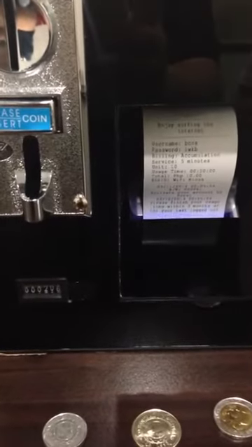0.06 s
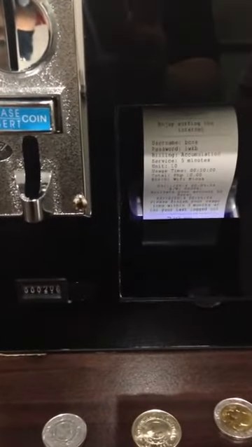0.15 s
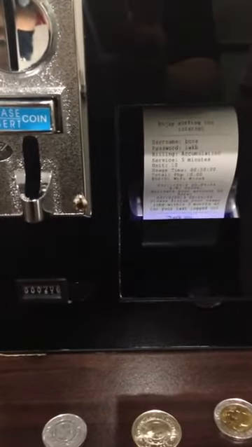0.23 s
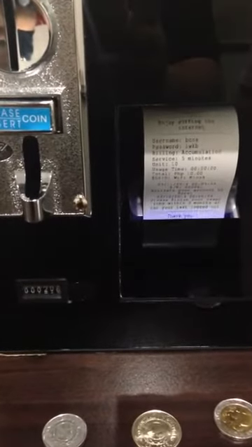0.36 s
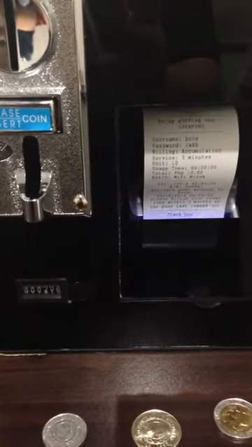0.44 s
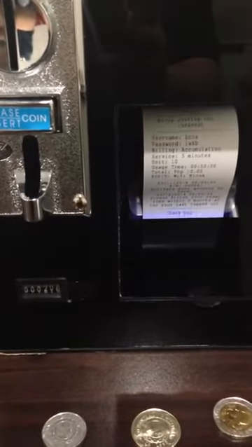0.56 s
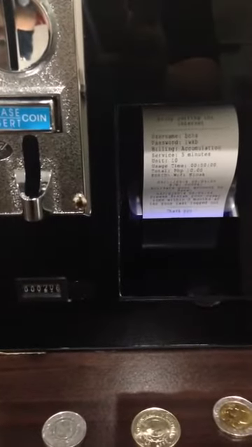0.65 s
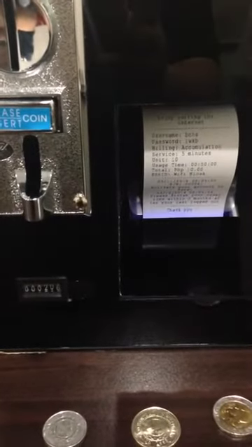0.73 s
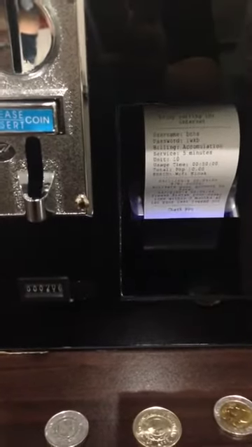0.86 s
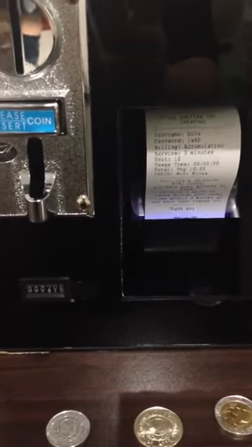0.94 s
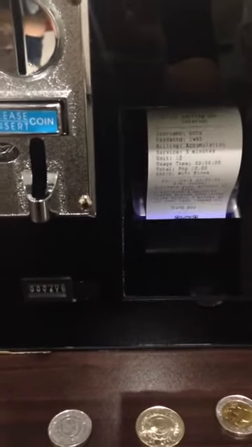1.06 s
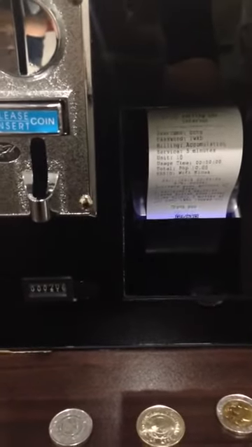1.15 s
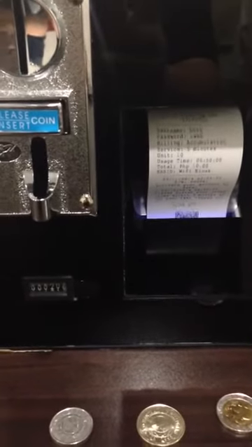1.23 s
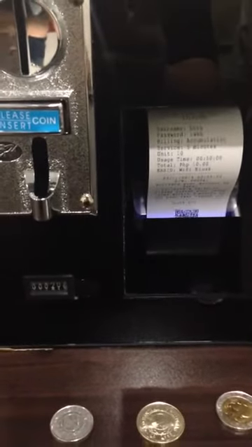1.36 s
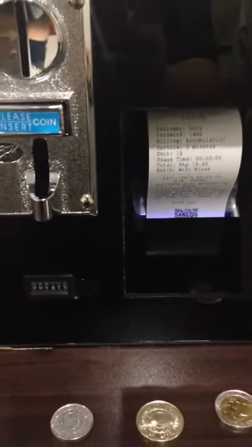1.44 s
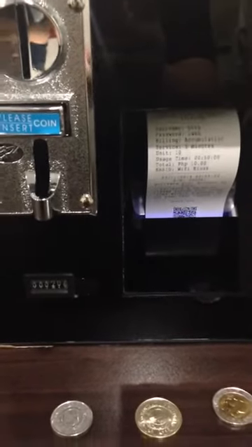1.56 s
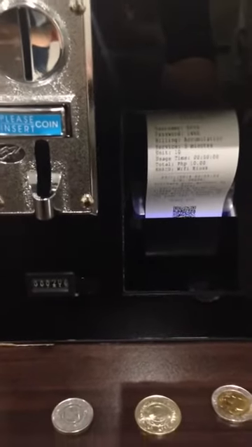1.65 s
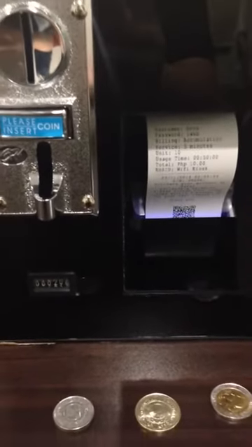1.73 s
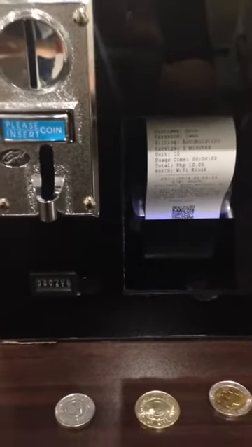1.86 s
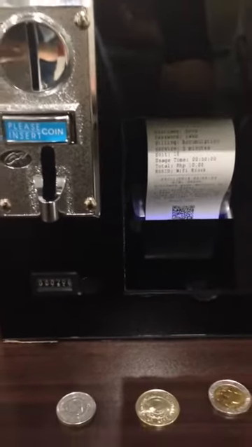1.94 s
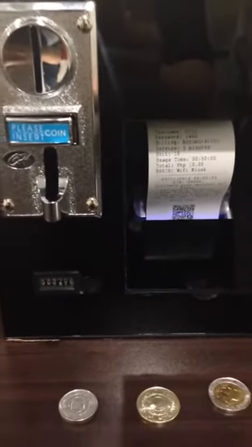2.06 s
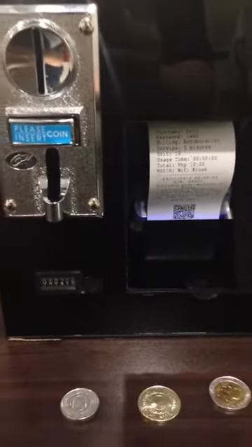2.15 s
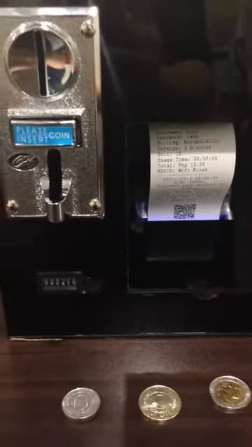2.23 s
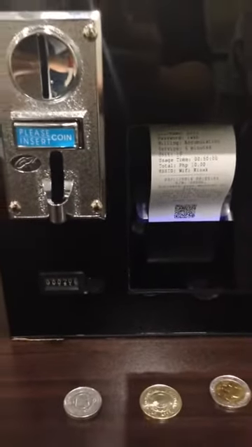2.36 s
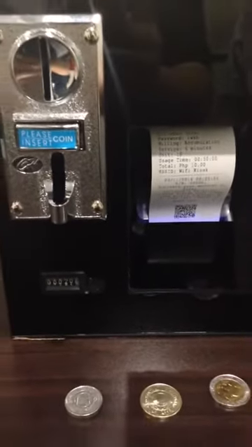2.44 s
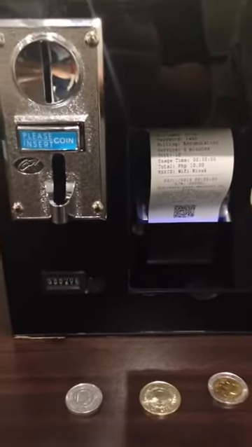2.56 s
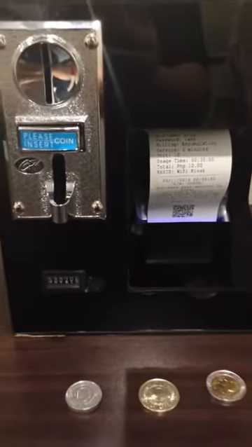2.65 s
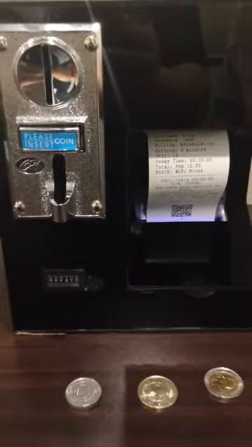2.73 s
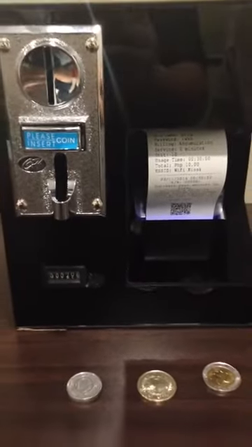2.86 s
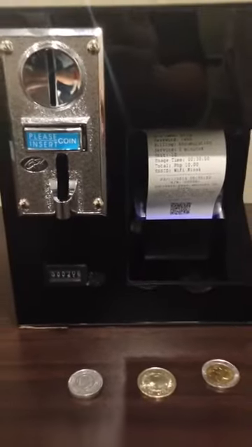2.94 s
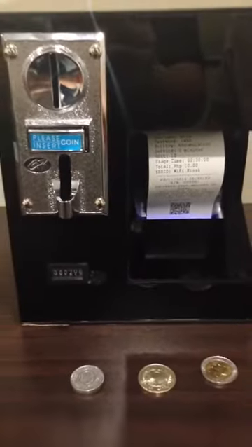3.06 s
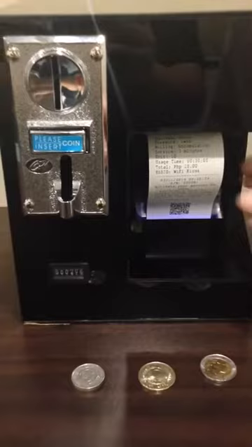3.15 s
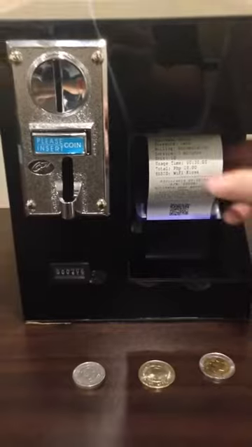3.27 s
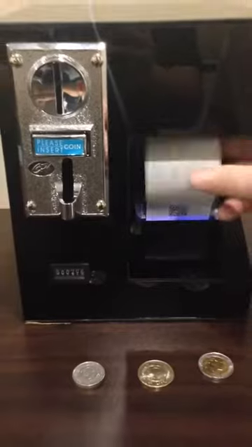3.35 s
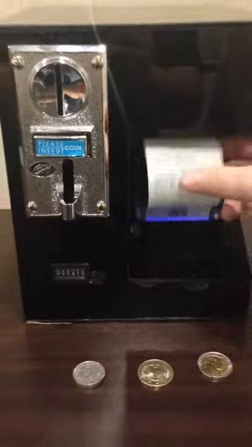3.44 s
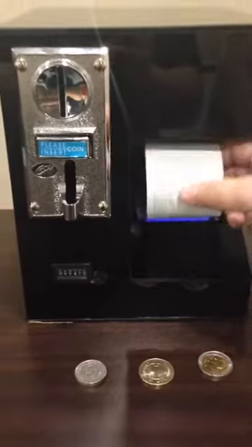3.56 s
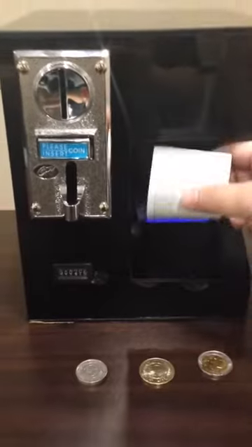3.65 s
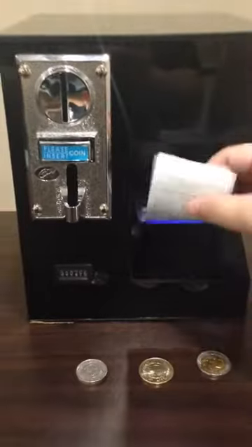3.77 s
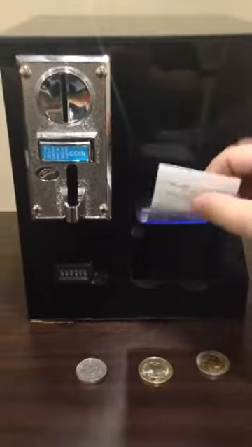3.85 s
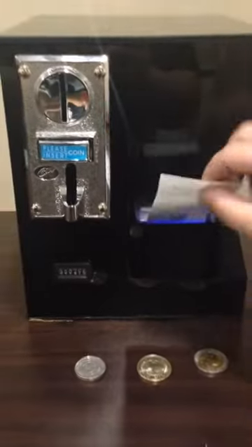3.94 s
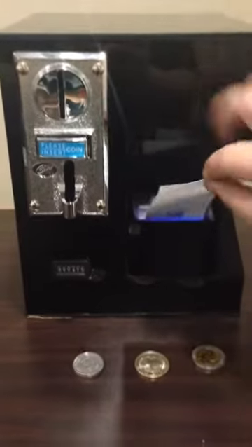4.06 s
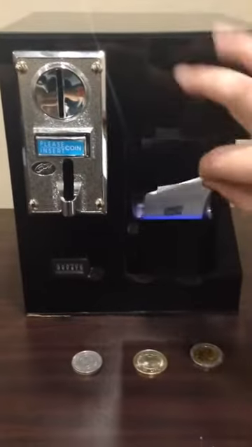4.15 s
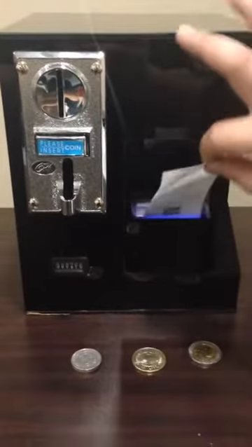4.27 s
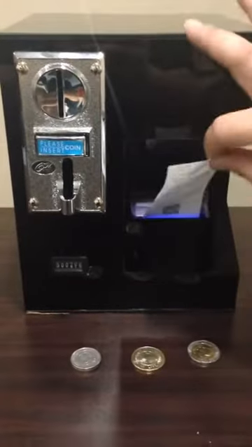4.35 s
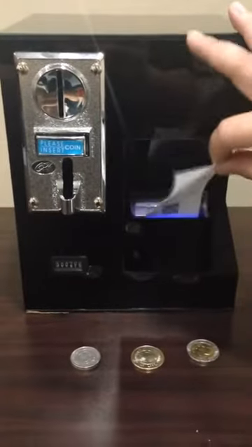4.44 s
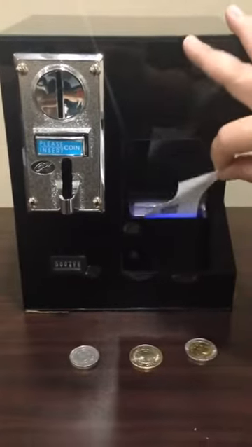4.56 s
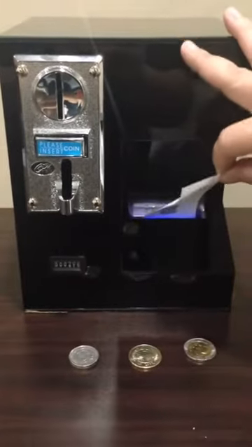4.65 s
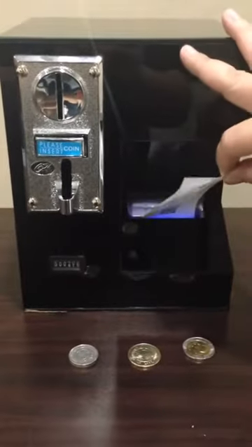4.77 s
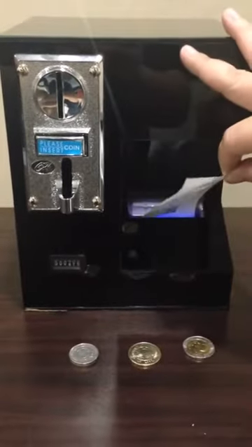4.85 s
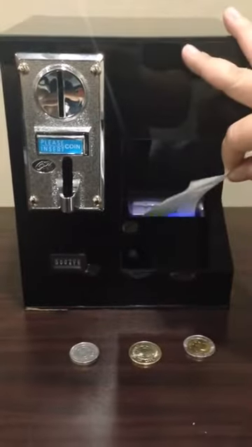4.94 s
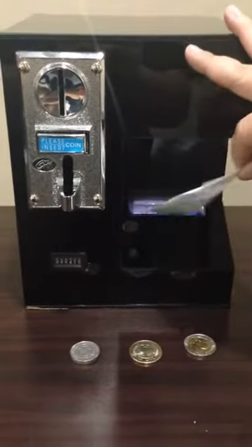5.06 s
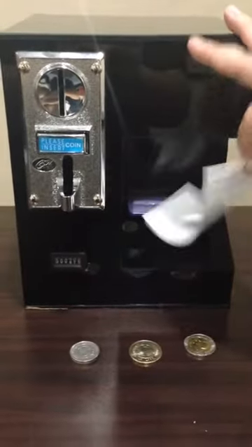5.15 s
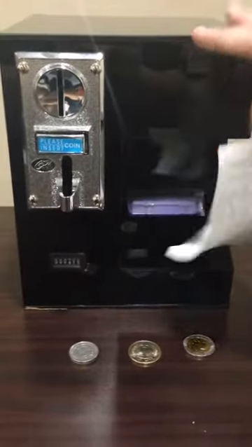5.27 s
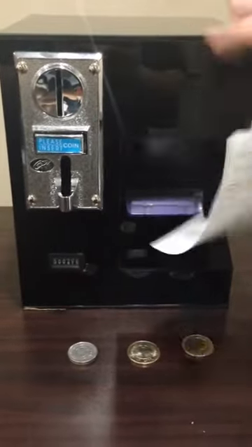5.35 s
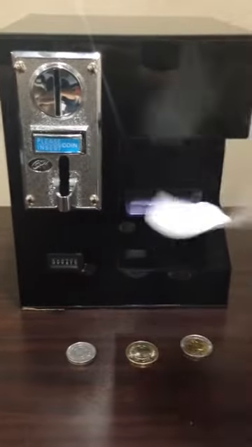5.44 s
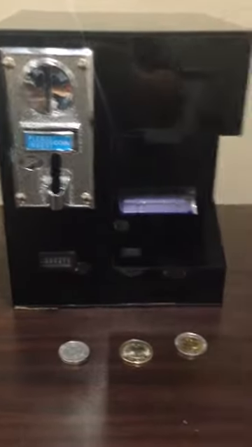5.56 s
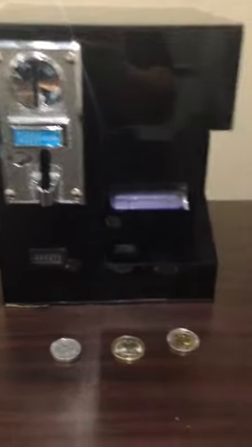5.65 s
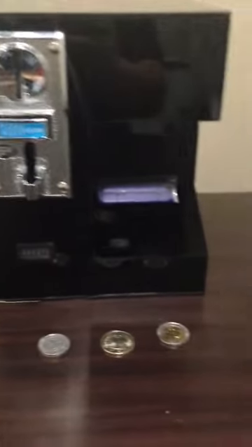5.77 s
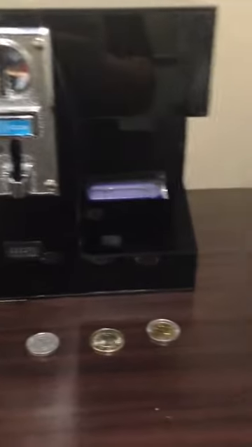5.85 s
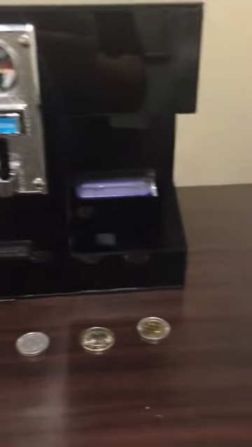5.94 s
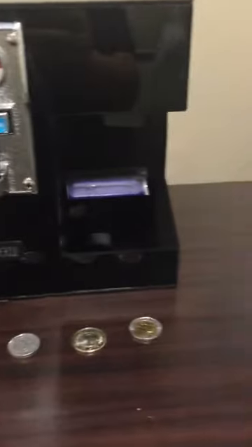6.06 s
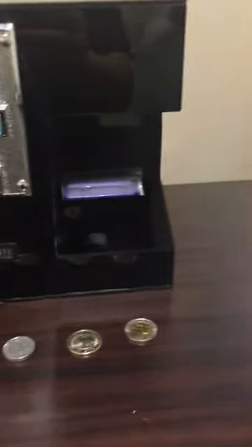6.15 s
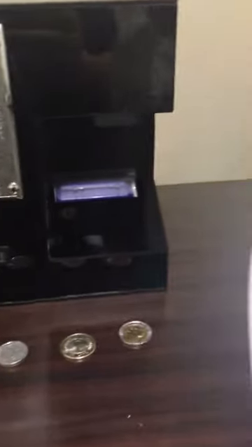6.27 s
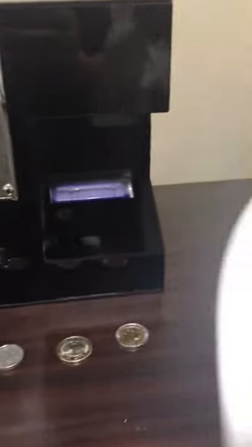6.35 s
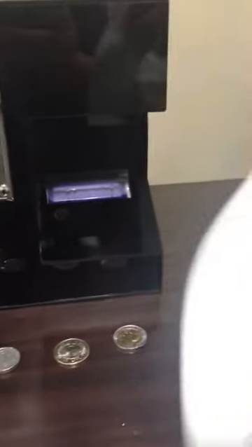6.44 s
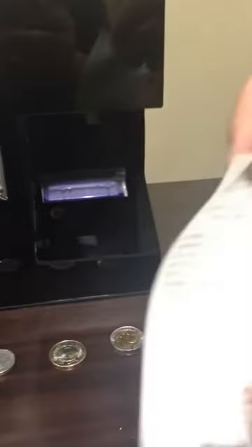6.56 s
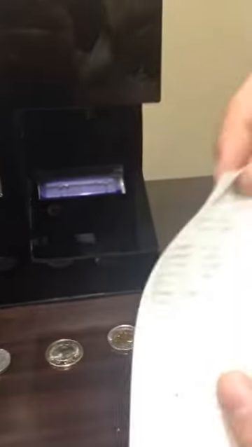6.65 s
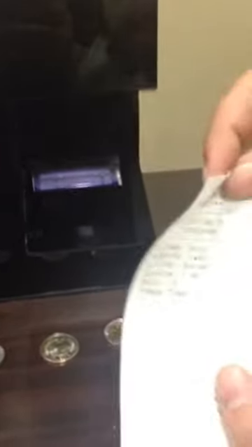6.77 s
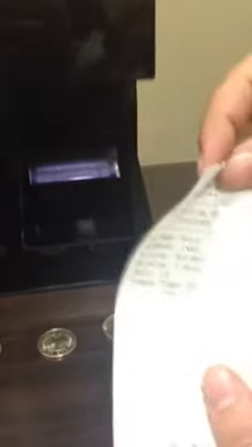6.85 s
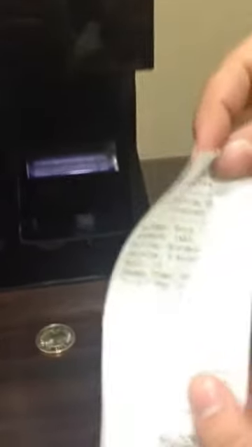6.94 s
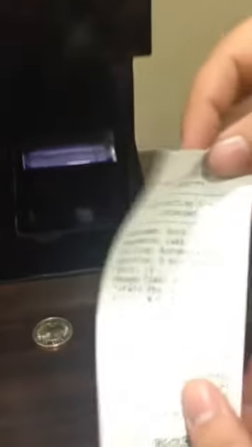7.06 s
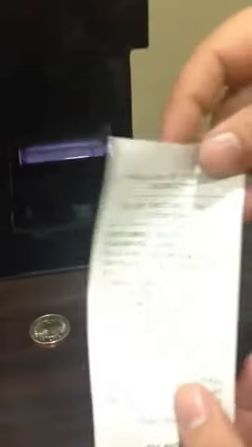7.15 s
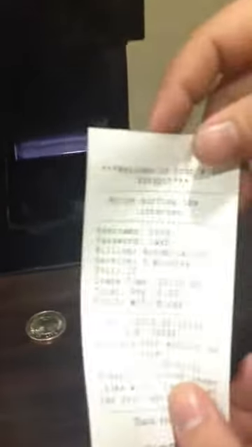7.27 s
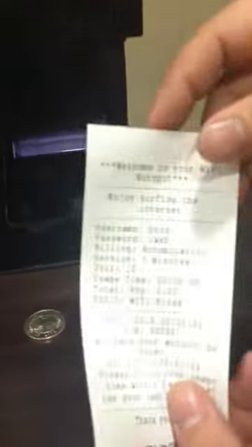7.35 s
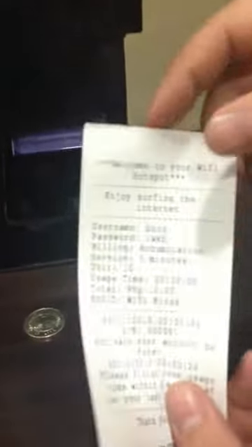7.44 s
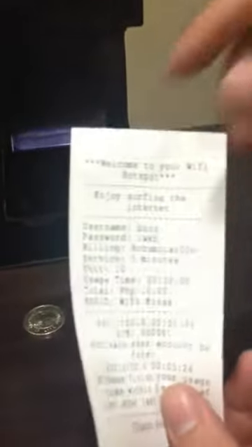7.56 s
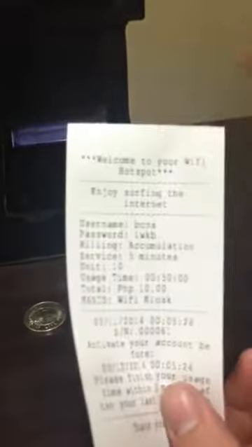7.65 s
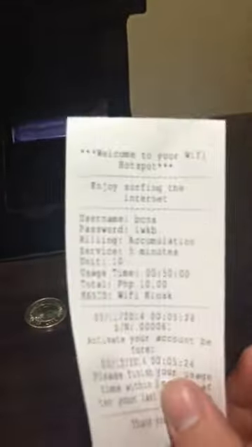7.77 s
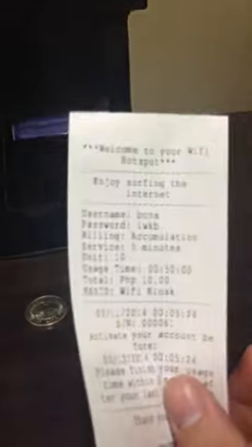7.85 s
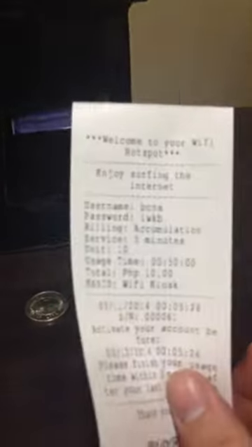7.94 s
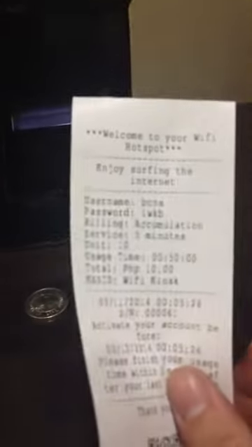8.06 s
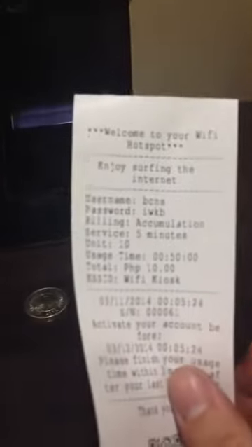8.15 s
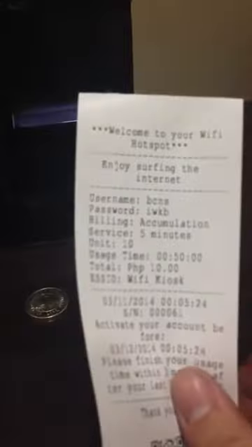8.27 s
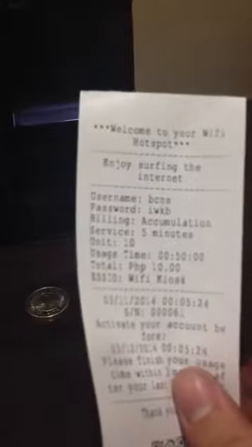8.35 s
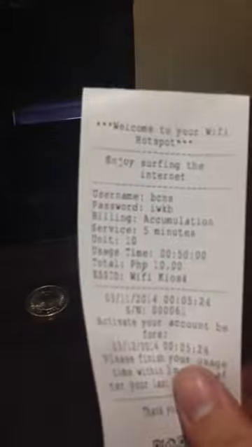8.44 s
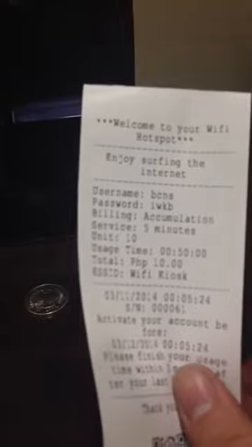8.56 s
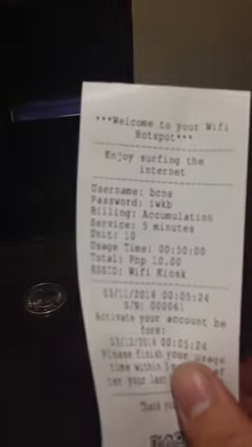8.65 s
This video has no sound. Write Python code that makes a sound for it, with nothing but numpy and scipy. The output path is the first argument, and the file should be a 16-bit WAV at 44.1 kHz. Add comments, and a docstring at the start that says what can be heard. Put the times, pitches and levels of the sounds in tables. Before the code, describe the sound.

A small receipt printer hums and buzzes out a slip, which is ripped off and then handled with light crinkles.

```python
"""A quiet room, a phone microphone close to a plastic kiosk with a small thermal printer inside.
A stepper motor feeds out a paper slip: its steps hum in the housing and tick in the gears.
Fingers take the slip and rip it along the serrated bar, fibres snapping and the kiosk shaking,
then flip and flatten it with rubs and buckling cracks. Behind it, a short reverberation and room tone."""
import sys
import numpy as np
from scipy import signal
from scipy.fft import rfft, irfft, next_fast_len
from scipy.io import wavfile
from scipy.ndimage import uniform_filter1d, map_coordinates

SR = 44100
rng = np.random.default_rng(int(sys.argv[2]) if len(sys.argv) > 2 else 0)


def digitize_waveform(pressure):
    """Quantize a signal to 16-bit integers and store it at the path in sys.argv[1].

    Rows of a 2-D input are taken as channels; values are limited to [-1, 1].
    """
    field = np.atleast_2d(pressure).T
    bounded = np.clip(field, -1, 1)
    quanta = np.round(bounded * 32767).astype(np.int16)
    wavfile.write(sys.argv[1], SR, quanta)


N = 383708
STOP_S = 2.6  # the feed ends
# Stretches of the paper feed. Each row: start in seconds, kind, load in dB, opening surge in dB.
FEED = [(0.003, "text", -0.5, -1.5), (0.172, "text", -0.5, 2), (0.473, "text", -1.2, 5.5),
        (0.588, "slow", -1.2, 0), (0.723, "text", -0.3, -2), (0.933, "text", -0.7, 3.5),
        (1.198, "slow", -1.9, 3.5), (1.292, "rush", 1.5, 2), (1.325, "block", 0.2, 7)]
# The kiosk's cavity and panels. Each row: resonance in Hz, width in Hz, gain in dB.
KIOSK_MODES = [(167.2, 37, -3.5), (345, 42, -3), (702, 25.4, 3.5)]


def printer():
    """Each motor step hums in the housing and ticks in the gears while the slip hisses over the head."""
    # The housing and a thin metal bracket. Each row: resonance in Hz, width in Hz, gain in dB.
    housing_modes = [(356, 48, 16), (540, 63, -17.5), (733, 82, -14.5), (880, 52, -13), (1095, 130, -18)]
    bracket_modes = [(2440, 103, 0)]
    drone_db, buzz_db, gear_db, bracket_db, hiss_db = feed_levels()
    low, high, kicks, steps = stepper()
    ring = resonant(kicks, housing_modes)
    ring /= np.abs(ring).max()
    drone = amp(drone_db) * (0.74 * low + 6.1 * band(ring, 196, 387))
    buzz = amp(buzz_db) * (0.9 * high + 4 * band(ring, 445, 1300))
    housing_noise, drag_noise, tooth_noise, gear_noise = rng.standard_normal((4, N))
    grind = amp(buzz_db - 7.5) * unit(resonant(housing_noise, housing_modes[1:]))
    grind += amp(drone_db - 10.5) * unit(band(drag_noise, 57, 420))
    mesh = np.hanning(150)  # teeth mesh for about 3 ms around each step
    chatter = np.convolve(steps, mesh, "same") * tooth_noise
    gears = amp(gear_db) * gear_train(steps, mesh, .65 * chatter + .25 * gear_noise)
    hiss = amp(hiss_db) * unit(band(chatter + 0.37 * drag_noise, 5150, 8030))
    bracket = 1.16 * amp(bracket_db) * unit(resonant(chatter + 1.16 * gear_noise, bracket_modes))
    return drone + buzz + grind + gears + hiss + bracket + thin_tick()


def stepper():
    """The stepping motor: low and high hum harmonics, kicks to the housing, impulses to the gears."""
    # Steps a second for each kind of feed.
    step_rates = {"text": 100, "block": 100, "slow": 84, "rush": 350}
    # Hum while printing text or a dense block. Each row: multiple of the step rate, relative level in dB.
    text_harmonics = [(1, -12), (2, -7.5), (3, 0.5), (4, -3), (5, -8.5), (6, -12.5), (7, -5), (8, -10.5),
                      (9, -7.5), (10, -17), (11, -7), (12, -19), (13, -26), (14, -19.5), (15, -24),
                      (16, -20), (17, -23), (18, -20), (19, -14), (20, -17), (21, -20), (22, -16.5),
                      (23, -15)]
    block_harmonics = [(1, -34), (2, -8), (3, 1), (4, -2), (5, -12), (6, -26), (7, -16.5), (8, -17),
                       (9, -12.5), (10, -7.5), (11, -13.5), (12, -17), (13, -21), (14, -26), (15, -23),
                       (16, -20.5), (17, -20), (18, -39), (19, -32), (20, -13.5), (21, -12.5), (22, -27),
                       (23, -17.5)]
    t = np.arange(N) / SR
    low, high, kicks, steps = np.zeros((4, N))
    drag = wobble(11.85)  # the drag of the paper roll varies
    ends = [row[0] - .004 for row in FEED[1:]] + [STOP_S]  # 4 ms ahead of the next stretch
    for (start, kind, *_), end in zip(FEED, ends):
        rate = step_rates[kind]
        at = np.round(np.arange(start - .0007, end, 1 / rate) * SR).astype(int)
        backlash_db = rng.normal(0, 1.3, len(at))
        steps[at] = amp(backlash_db + 1.2 * drag[at]) / max(rate / 150, 1)
        if kind in ("slow", "rush"):
            strong_weak = 1 - .5 * (np.arange(len(at)) % 2)
            kicks[at] = (kind == "slow") * strong_weak + .08
            continue
        running = np.clip(np.minimum(t - start, end - t) / 0.0033 + 1, 0, 1)
        phase = 2 * np.pi * rate * t + 0.029 * wobble(24.94)  # timing jitter blurs the high harmonics
        # Each printed line loads the motor anew: fresh phases.
        partials = [amp(db + 1.03 * wobble(8.03)) * np.sin(k * phase + rng.uniform(0, 2 * np.pi))
                    for k, db in (text_harmonics if kind == "text" else block_harmonics)]
        low += running * unit(sum(partials[:4]))
        high += running * unit(sum(partials[4:]))
    return low, high, kicks, steps


def feed_levels():
    """Level curves of the printer's layers: each stretch opens with a surge or dip, the last coasts out."""
    # For each kind of feed: relative levels of drone, buzz, gears, bracket and hiss in dB.
    layer_db = {"text": (-55, -56.5, -58, -65, -72), "block": (-53, -59.5, -56, -68, -77),
                "slow": (-51, -50.5, -59.5, -65, -75), "rush": (-56, -49, -52, -56, -69.5)}
    # The share of the surge that reaches each of those layers.
    surge_share = (1, 0.46, 0.3, 0.35, .3)
    t = np.arange(N) / SR
    starts, kinds, loads, surges = map(np.array, zip(*FEED))
    stretch = np.clip(np.searchsorted(starts, t) - 1, 0, None)
    age = (t - starts[stretch]) / 0.017  # the surge peaks after 17 ms
    surge_db = np.outer(surge_share, surges[stretch] * age * np.exp(1 - age))
    coast_db = -800 * np.clip(t - STOP_S, 0, 1)
    steady_db = np.array([layer_db[kind] for kind in kinds])[stretch].T + loads[stretch]
    return [uniform_filter1d(db, size=300) + 0.73 * wobble(11.16) for db in steady_db + surge_db + coast_db]


def gear_train(steps, mesh, rattle):
    """Meshing teeth ping on each step; pings and rattle ring through the gears."""
    # The gears. Each row: resonance in Hz, width in Hz, gain in dB, for each of two passes.
    gear_modes = [(2020, 870, -2.5), (3320, 380, 0.5), (4050, 470, 0.53), (4900, 420, -0.5),
                  (5340, 620, -4)]
    t = np.arange(len(mesh)) / SR
    ping = mesh ** 2 * sum(np.sin(2 * np.pi * hz * t) for hz in (3420, 4030))
    drive = rattle + .22 * np.convolve(steps, ping, "same")
    ticks = resonant(resonant(drive, gear_modes), gear_modes)
    ticks -= resonant(ticks, [(2710, 330, -0.3)])  # the hollow casing swallows one band
    return ticks / np.std(ticks[:2 * SR])


def thin_tick():
    """One high, quickly damped tick from the mechanism."""
    # Each row: start in seconds, peak level in dB, pitch in Hz.
    ticks = [(0.4329, -42, 8300)]
    out, t = np.zeros(N), np.arange(400) / SR
    for start, db, hz in ticks:
        out[round(start * SR):][:len(t)] += amp(db - 60 * t / 0.0089) * np.sin(2 * np.pi * hz * t)
    return out


def rip():
    """Fibres let go in uneven slips along the serrated bar, and the pull shakes the kiosk."""
    # The pull. Each row: time in seconds, relative level in dB.
    pull_curve = [(4.8, -41), (4.835, -41), (4.852, -37.5), (4.874, -55.5), (4.914, -38), (4.938, -43.5),
                  (4.95, -30.5), (5.012, -31), (5.02, -43), (5.052, -48), (5.058, -29), (5.148, -25.5),
                  (5.16, -28.5), (5.176, -26.5), (5.204, -43), (5.3, -58.5)]
    # Body and sheen of tearing paper. Each row: frequency in Hz, relative level in dB.
    body_spectrum = [(530, -35), (900, -11.5), (2580, -3.5), (2750, 6.5), (2950, -10), (4460, 0.5),
                     (8000, -17.5), (10400, -40), (17600, -120)]
    sheen_spectrum = [(4120, -24.5), (7000, -7.5), (8900, -6.5), (14900, -0.5), (15700, -14.5),
                      (16500, -62)]
    fizz = crackle(rate=420, spread_db=3, t60=.0045, hiss=.45)
    typical_pull = amp(-33)
    pull = stroke(pull_curve) / typical_pull
    body = amp(-3) * pull * unit(coloured(fizz, body_spectrum))
    sheen = amp(-9) * pull ** 1.32 * unit(coloured(fizz, sheen_spectrum))  # a harder pull is brighter
    shake = amp(-19) * pull * unit(resonant(fizz, KIOSK_MODES[:2]))
    return typical_pull * (body + sheen + shake)


def fibre_snaps():
    """Fibres break on the bar, each with a bright crack and a knock on the kiosk panel."""
    # Each row: peak time in seconds, relative level in dB, pitch in Hz.
    breaks = [(4.8015, -23.5, 3220), (4.8205, -38, 4200), (4.8442, -19.5, 4240), (4.8961, -27, 4300),
              (4.9104, -21.5, 4000), (4.9335, -26, 4200), (4.9491, -24.5, 5190), (4.9539, -23, 4300),
              (4.972, -23.5, 3230), (4.9843, -21, 4600), (4.9925, -16.5, 4300), (4.9992, -20.5, 4000),
              (5.0252, -20, 4900), (5.0482, -30, 3500), (5.0592, -20.5, 4620), (5.1008, -25.5, 3980),
              (5.1089, -19, 4400), (5.1215, -16.5, 3900), (5.1258, -16.5, 3700), (5.1402, -21.5, 4100),
              (5.1484, -25, 3800), (5.1686, -14, 4050), (5.1776, -10.5, 3340), (5.2671, -32.5, 4200)]
    out, knocks = np.zeros((2, N))
    for peak_s, db, hz in breaks:
        treble_db = rng.normal(-5.5, 5.5)
        puff_db = rng.normal(-13.5 - .6 * (db + 22), 5.5)  # louder cracks carry a smaller share of puff
        out += crack(peak_s, db, hz, 0.68, 10, treble_db, puff_db, top_hz=15500)
        knocks[round(peak_s * SR)] = amp(0.74 * db + 19.5)
    return out + resonant(knocks, KIOSK_MODES[2:])


def buckles():
    """The slip buckles in the fingers, in cracks that reach less high than breaking fibres."""
    # Each row: peak time in seconds, relative level in dB, pitch in Hz, rise in ms, t60 in ms,
    # treble trim in dB, low puff trim in dB.
    cracks = [(3.433, -49, 2960, 0.91, 4.5, -13, -3), (3.5256, -53.5, 3630, 2.2, 14, -11, 1.5),
              (3.57, -46.5, 4500, 1.2, 8.5, -6, -16), (3.5751, -50, 3900, 1.3, 6.7, -9, -20),
              (3.6585, -51, 4900, .55, 13, -7, -5), (3.6827, -38, 3180, 0.99, 21, -13, -12),
              (3.701, -43.5, 3040, 3.3, 6.4, -5, -10), (3.826, -58, 3500, 1.1, 21, -11, -9),
              (3.906, -44, 2850, 1.1, 20, -14, -17), (4.6202, -31.5, 4930, 0.57, 10.6, -6, -12.5),
              (4.702, -54, 4700, 1.1, 27, -9, -5), (4.727, -52, 5100, 1.2, 15, -16, -3),
              (4.7612, -53.5, 4400, 1.5, 22, -15, -5), (5.6264, -52, 4500, 1.9, 8.6, -8.5, -26),
              (5.6777, -24, 4620, 2.1, 26, -25, -15), (5.6855, -26, 4070, 2.9, 13, -20, -14),
              (5.69, -33, 4600, 2.9, 21, -16, -29), (5.781, -35.5, 3300, 0.92, 17, -5, -13),
              (5.7953, -20, 4960, 3, 25, -0.5, -26), (5.8087, -23.5, 4480, 2.9, 5.7, 0, -20.5),
              (6.6987, -47, 2800, .74, 6.5, -15, -9), (6.7154, -35.5, 4700, 2.1, 28, 7.5, -18),
              (6.7198, -31.5, 3220, 1.1, 17, 3.5, -18), (6.7989, -24.5, 3450, 0.21, 30, -37, -10),
              (6.8613, -46.5, 4200, 1.4, 7.2, 2.5, -19), (6.9354, -44.5, 4300, 1.9, 32, 2.5, -8),
              (6.951, -31.5, 3540, 0.62, 47, -7, -21), (6.9592, -21, 3200, 0.94, 2.8, -16, -14),
              (6.9635, -25.5, 3640, 3.2, 8.5, -28, -8), (6.9688, -34.5, 3320, 1.3, 9.3, -23, -5),
              (7.1765, -41, 3500, 0.79, 2.7, -1, 1), (7.2023, -50, 2830, .6, 15, -16, -3),
              (7.2794, -45.5, 2930, 0.95, 8.4, -17, -6), (7.5397, -40, 2430, 1.7, 26, -26, -7),
              (7.5987, -53.5, 4040, 2.4, 34, -13, -12)]
    return sum(crack(*row, top_hz=12000) for row in cracks)


def crack(peak_s, db, hz, rise_ms, t60_ms, treble_db, puff_db, top_hz):
    """One paper crack: a noise burst with a body around hz, a treble edge and a low puff."""
    out, lead = np.zeros(N), 400
    ms = 1000 * np.arange(-lead, SR // 12) / SR
    envelope = np.where(ms < 0, np.exp(-(ms / rise_ms) ** 2), amp(-60 * ms / t60_ms))
    body, top, puff = rng.standard_normal((3, len(ms))) * envelope
    pitched = band(body, hz / 1.22, hz * 1.18)  # the flexed patch favours one pitch
    body = band(body, hz / 2.25, hz * 1.55) + 0.29 * pitched
    top, puff = band(top, 5400, top_hz), band(puff, 130, 1100)
    body, top, puff = [part / np.abs(part).max() for part in (body, top, puff)]
    burst = body + amp(treble_db - 5.5) * top + amp(puff_db - 4) * puff
    out[round(peak_s * SR) - lead:][:len(ms)] = amp(db + 2.5) * burst
    return out


def rustle():
    """Fingers bend and rub the slip: fine, nearly even friction, with one slide along the edge."""
    # Each row: loudest moment, 20 dB swell and 20 dB fade in seconds, relative level and treble trim in dB.
    rubs = [(3.47, 0.076, .04, -52.5, -5), (3.52, .015, .1, -59.5, -5), (3.57, .012, 0.11, -57, -4),
            (3.645, .015, .06, -61, -3), (3.68, 0.013, 0.043, -45.5, -5.5), (3.844, 0.1, 0.1, -53.5, -5),
            (4.75, .2, 0.12, -66, -7), (5.668, 0.045, .03, -53, -10), (5.7, .012, 0.092, -44, -20),
            (5.735, .012, 0.073, -54.5, 3), (5.82, .012, 0.044, -36.5, -13), (5.87, 0.027, .17, -58, -12),
            (6.706, 0.02, 0.035, -53, -8), (6.92, 0.39, .03, -57, -3), (6.95, 0.012, 0.18, -56.5, 4),
            (7.034, 0.062, 0.026, -54, -1.5), (7.18, 0.01, 0.0065, -45, -16), (7.2, 0.11, .5, -63.5, -15),
            (7.535, 0.067, 0.058, -53.5, -12)]
    # Body and treble of handled paper. Each row: frequency in Hz, relative level in dB.
    body_spectrum = [(530, -29), (900, -12), (1290, -14), (1540, -10), (2290, -5.5), (2950, -11),
                     (3450, -3.5), (8000, -12.5), (10400, -31), (17600, -120)]
    top_spectrum = [(4120, -14.5), (7000, -6.5), (10300, -1), (13500, -3), (15500, -5)]
    fizz = crackle(rate=780, spread_db=4.5, t60=0.012, hiss=1.6)
    t = np.arange(N) / SR
    body_power, top_power = np.zeros((2, N))
    for peak_s, swell, fade, db, treble_db in rubs:
        level_db = db - 20 * np.maximum((peak_s - t) / swell, (t - peak_s) / fade)
        body_power += amp(level_db - 6.5) ** 2
        top_power += amp(level_db + treble_db - 4.5) ** 2
    body = np.sqrt(body_power) * unit(coloured(fizz, body_spectrum))
    top = np.sqrt(top_power) * unit(coloured(fizz, top_spectrum))
    return body + top + finger_slide(fizz)


def finger_slide(fizz):
    """A finger scrapes along the paper's edge; the middle band swells as the sheen fades."""
    # Each row: time in seconds, finger pressure in dB.
    pressure = [(3.9, -63), (3.92, -61.5), (4.036, -66.5), (4.1, -59), (4.122, -66), (4.14, -88)]
    # Low, middle and sheen bands. Each row in a band: resonance in Hz, width in Hz, gain in dB, per pass.
    scrape_bands = [
        [(2840, 2500, 0)],
        [(3930, 440, 1), (5400, 1900, 1.5)],
        [(7850, 5900, 10), (11400, 2000, 1)],
    ]
    # Each row: one band's gain at the start and at the end of the slide, in dB.
    band_gains = [(-1, -1), (-1.5, 4), (1.5, -2)]
    progress = np.interp(np.arange(N) / SR, [pressure[0][0], pressure[-1][0]], [0, 1])
    scrape = sum(amp(first + (last - first) * progress) * unit(resonant(resonant(fizz, modes), modes))
                 for (first, last), modes in zip(band_gains, scrape_bands))
    return stroke(pressure) * scrape


def reverberation(x):
    """The walls answer with a noise tail, new every third of a second; each frequency dies at its own rate."""
    # Each row: frequency in Hz, t60 in seconds.
    decay_times = [(200, 0.41), (2000, 0.19), (6000, 0.24), (14000, 0.018)]
    # Colour of the reflections. Each row: frequency in Hz, gain in dB.
    wall_colour = [(100, -3), (500, 3), (1500, 1), (4000, -2.5), (9000, -1), (15000, 7)]
    out, hop, delay = np.zeros(N + SR), SR // 3, 200
    for at in range(0, N, hop):
        hz, t, noise = signal.stft(rng.standard_normal(SR // 2), SR, nperseg=256)
        decay = amp(-60 * t / along(decay_times, hz)[:, None])
        tail = signal.istft(noise * decay, SR, nperseg=256)[1]
        wet = signal.fftconvolve(x[at:at + hop], tail / np.linalg.norm(tail))
        out[at + delay:][:len(wet)] += wet
    return coloured(out[:N], wall_colour)


def room_tone():
    """The quiet room itself: unsteady rumble, a fuzzy low hum, smooth hiss above."""
    # Each row: frequency in Hz, relative level in dB.
    tone_spectrum = [(15, -63), (25, -37.5), (48, -15.5), (69, -12.5), (86, -29), (107, -13.5), (148, -9),
                     (204, -14), (240, -5), (552, -14.5), (614, -15), (703, -21.5), (3090, -29),
                     (14300, -30.5), (15500, -31.5)]
    tone = coloured(rng.standard_normal(N), tone_spectrum)
    low = filtered(tone, lambda hz: hz < 600)
    rumble = unit(low) * amp(-68.5 + 1.1 * wobble(6))
    hum = unit(resonant(rng.standard_normal(N), [(236.5, 71, 0)])) * amp(-69.5 + 0.59 * wobble(5))
    return rumble + hum + amp(-67) * unit(tone - low)


def crackle(rate, spread_db, t60, hiss):
    """Paper noise: about rate short bursts a second over a steady hiss."""
    slips = amp(spread_db * rng.standard_normal(N)) * (rng.random(N) < rate / SR)
    bursts = np.convolve(slips, amp(-60 * np.arange(600) / SR / t60))[:N]
    return (unit(bursts) + hiss) * rng.standard_normal(N)


def stroke(points):
    """Gain of one hand movement through (seconds, dB) points, silent outside its span."""
    t = np.arange(N) / SR
    times, db = np.transpose(points)
    touch = np.clip(np.minimum(t - times[0], times[-1] - t) / 0.0046, 0, 1)
    return touch * amp(np.interp(t, times, db))


def amp(db):
    """Decibels to gain."""
    return 10 ** (np.asarray(db) / 20)


def unit(x):
    """x scaled to rms 1."""
    return x / np.sqrt(np.mean(x ** 2) + 1e-20)


def along(points, hz):
    """Interpolate (Hz, value) points on a log frequency axis."""
    freqs, values = np.transpose(points)
    return np.interp(np.log(hz + 1), np.log(freqs + 1), values)


def wobble(rate):
    """A smooth random curve, rate knots a second."""
    return map_coordinates(rng.standard_normal(int(N * rate / SR) + 4), [np.arange(N) * rate / SR])


def filtered(x, response):
    """x through a complex frequency response."""
    size = next_fast_len(len(x) + 8192)
    return irfft(rfft(x, size) * response(np.fft.rfftfreq(size, 1 / SR)), size)[:len(x)]


def coloured(x, spectrum):
    """x through a spectrum of (Hz, dB) points."""
    return filtered(x, lambda hz: amp(along(spectrum, hz)))


def resonant(x, modes):
    """x through (Hz, width in Hz, dB) resonances, summed with alternating signs."""
    return filtered(x, lambda f: sum((-1) ** k * amp(db) * 1j * f * width / (hz**2 - f**2 + 1j * f * width)
                                     for k, (hz, width, db) in enumerate(modes)))


def band(x, lo_hz, hi_hz):
    """Causal band-pass."""
    return signal.sosfilt(signal.butter(2, [lo_hz, hi_hz], "bandpass", fs=SR, output="sos"), x)


def scene():
    """Printer and paper from close by; the boxed-in printer stirs the room less than the paper does."""
    motor = printer()
    paper = fibre_snaps() + buckles() + rustle() + rip()
    reflections = amp(-12.5) * reverberation(amp(-6.5) * motor + paper)
    return (motor + paper + reflections + room_tone())[None]


def record(dry):
    """The phone's mono microphone: the treble drops above 15.25 kHz and is cut off at 16.64 kHz."""
    return filtered(dry[0], lambda hz: amp(np.interp(hz, [15250, 15500], [0, -25.5])) * (hz < 16640))[None]


dry = scene()
out = record(dry)
digitize_waveform(out)
```